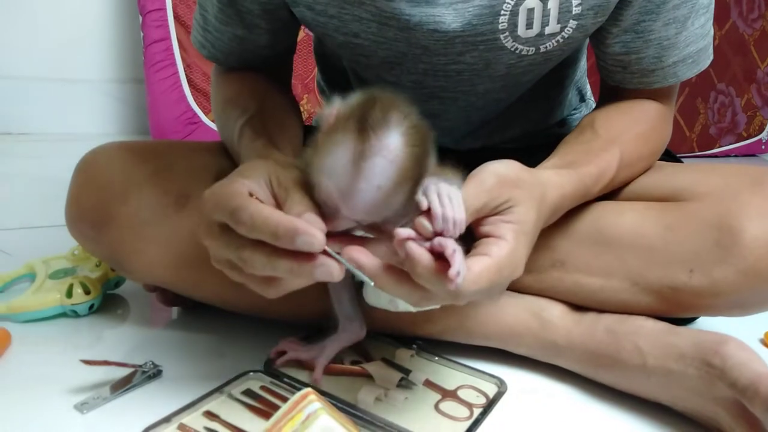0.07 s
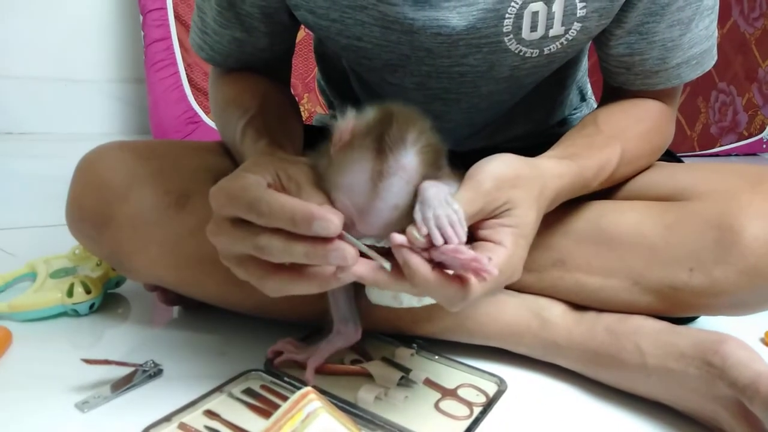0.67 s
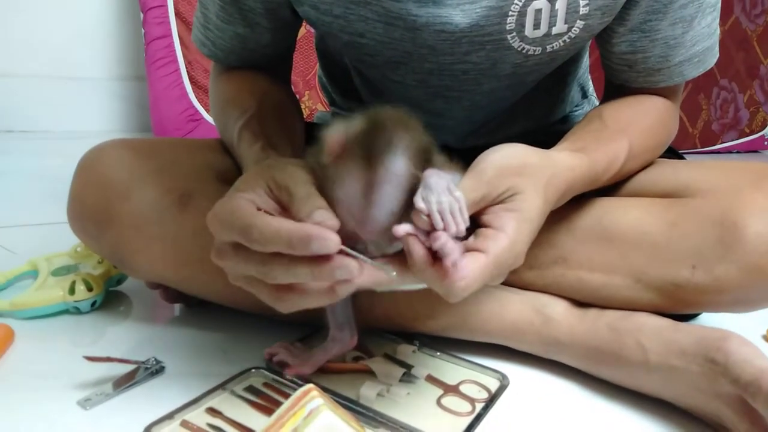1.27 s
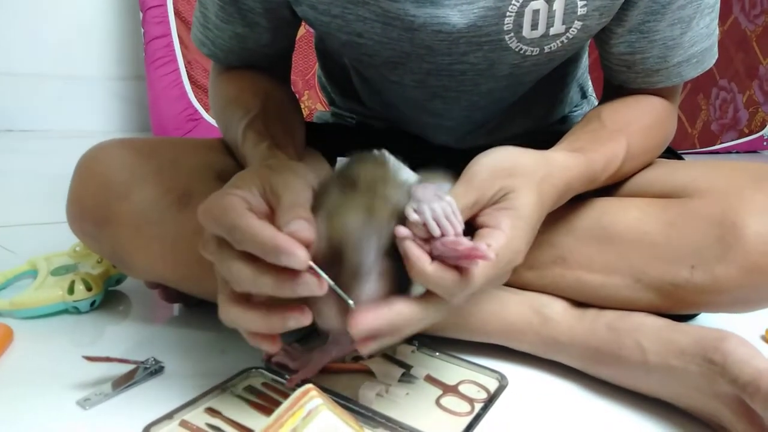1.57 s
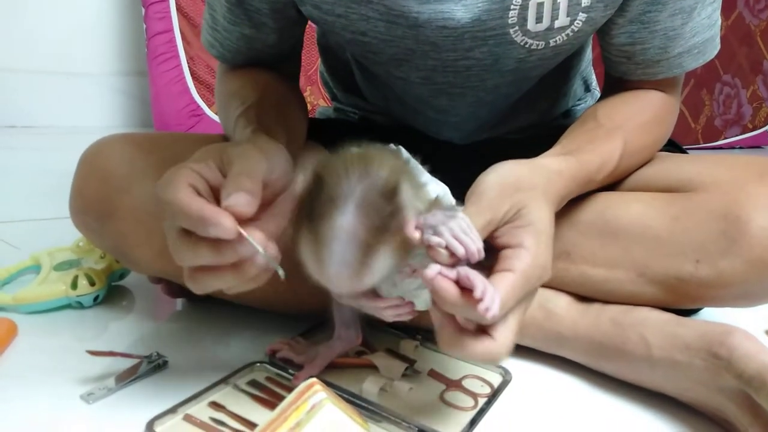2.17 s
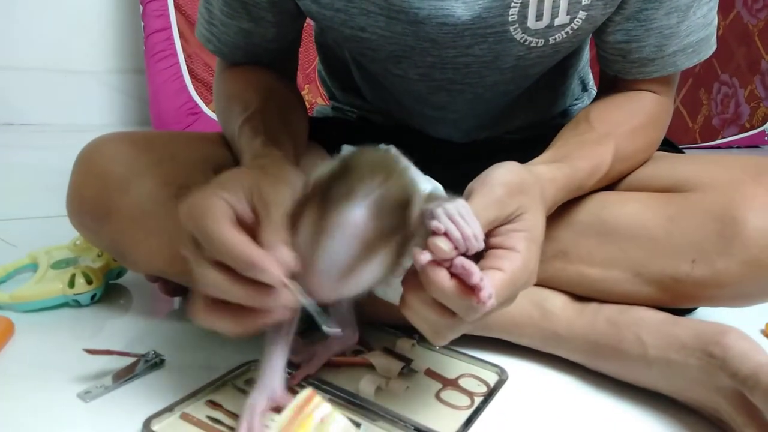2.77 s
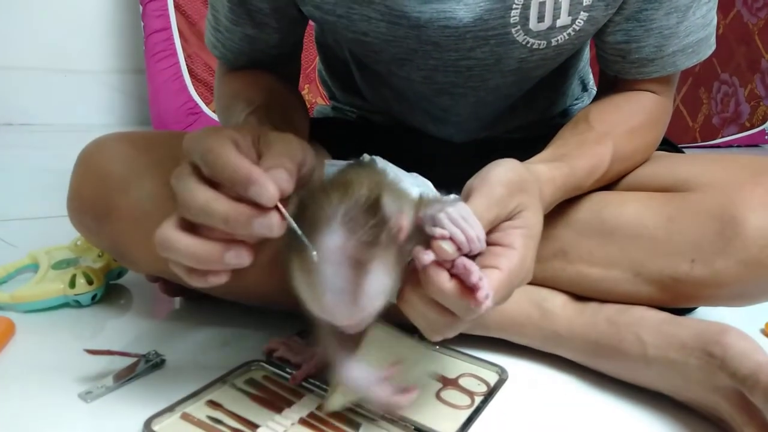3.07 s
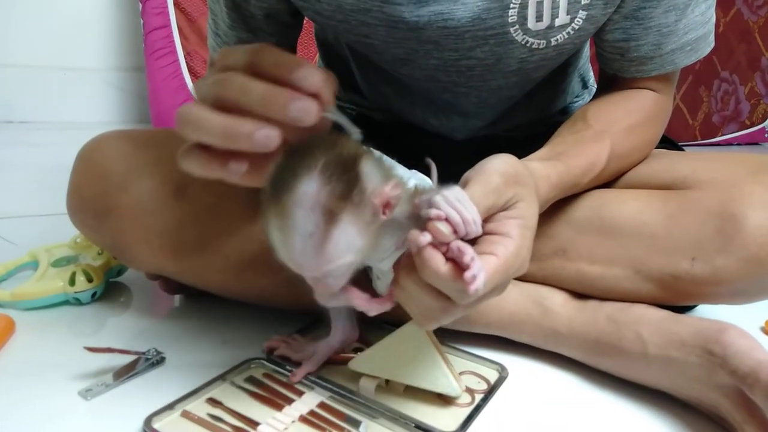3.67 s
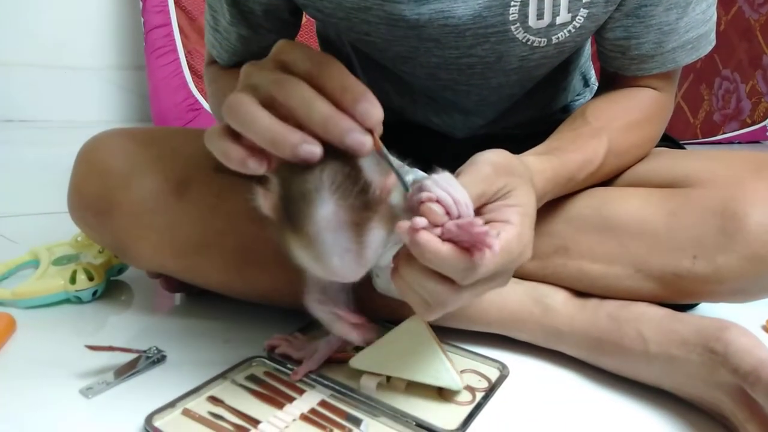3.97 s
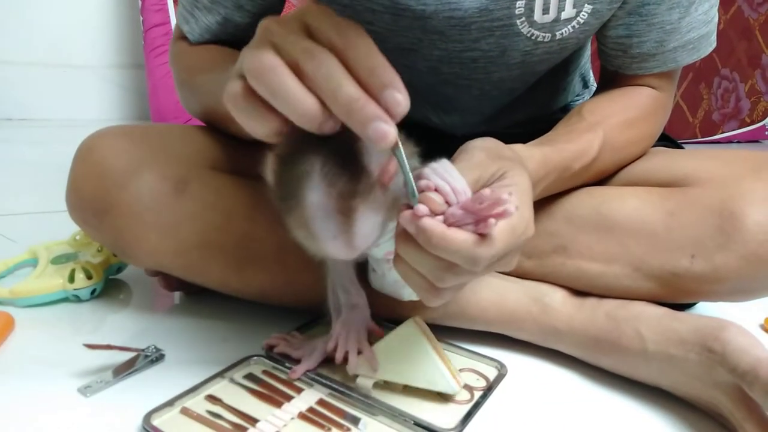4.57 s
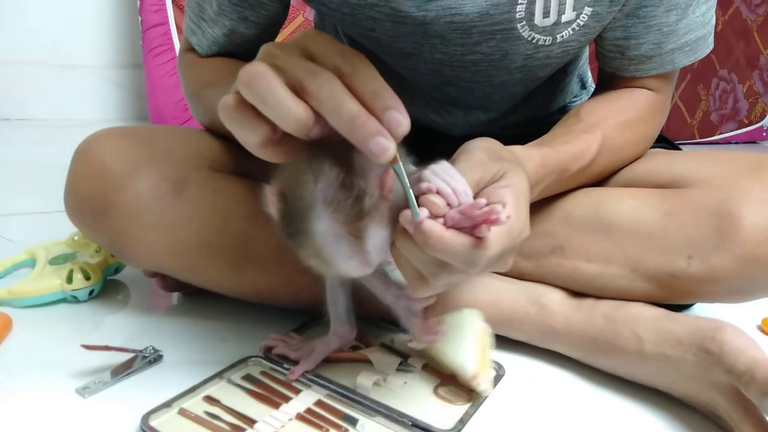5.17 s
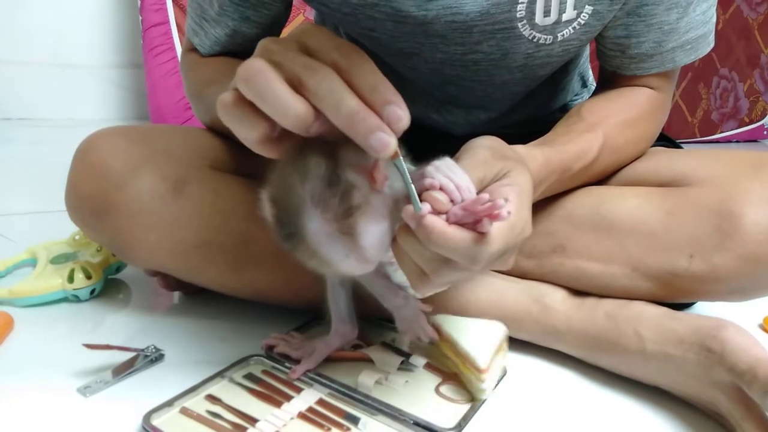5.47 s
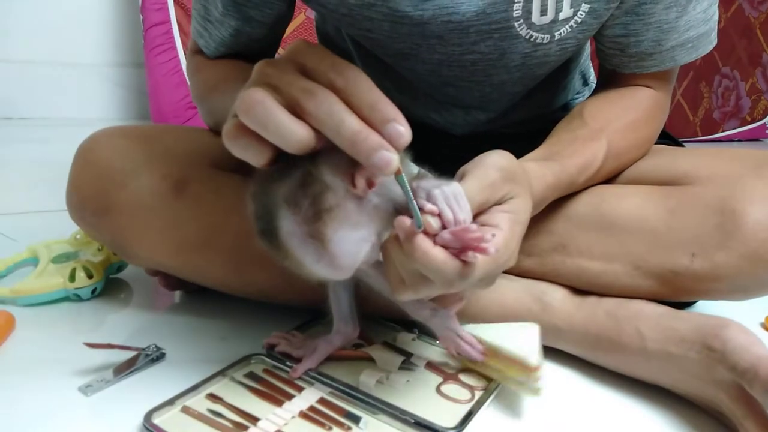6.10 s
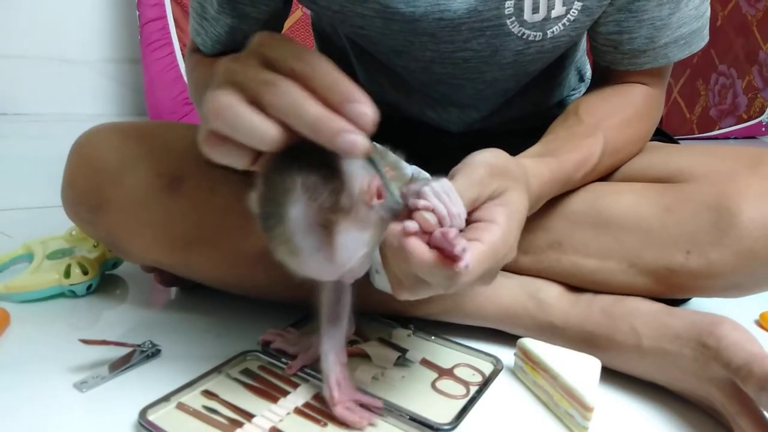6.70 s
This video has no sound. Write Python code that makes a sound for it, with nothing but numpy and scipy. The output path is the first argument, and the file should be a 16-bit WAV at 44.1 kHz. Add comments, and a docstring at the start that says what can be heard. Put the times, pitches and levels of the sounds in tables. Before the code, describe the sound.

For the first two and a half seconds, a small steel tool picks at a baby monkey's nails with faint, scattered ticks and a little soft rubbing. From about 2.7 seconds a paw and a toy knock an open manicure case, and its steel tools rattle in a quick, lightly ringing clatter. A sharper knock with a soft floor bump comes at 3.5 seconds, and another knock just after. A lull follows, with tiny taps and a brief scrape near 4.9 seconds. The clatter returns from 5.2 to 5.6 seconds, then again in a busy run from 6.2 to 6.7 seconds, with fur and cloth rubbing underneath. The sounds are small and fairly near, each click ringing briefly off the hard walls of a quiet tiled room over a faint steady hiss.

```python
"""An open manicure case knocks and its steel tools rattle as a baby monkey paws at it, reaching for a toy.
Each knock is a short clatter, pitched by the struck spot, and the whole case rings on. A small steel
tool picks at the monkey's nails with faint ticks. Fur and cloth rub, limbs and toy bump the floor,
and the hard walls of the quiet tiled room ring after every click."""
import sys
import numpy as np
from scipy import signal
from scipy.fft import rfft, irfft
from scipy.io import wavfile
from scipy.ndimage import uniform_filter1d

SR = 44100
rng = np.random.default_rng(int(sys.argv[2]) if len(sys.argv) > 2 else 0)


def master(y):
    """Save y as 16-bit WAV."""
    cut = np.clip(np.atleast_2d(y).T, -1, 1)
    pcm = np.round(cut * 32767)  # scale
    wavfile.write(sys.argv[1], SR, pcm.astype(np.int16))


N = 306054


def amp(db):
    """Decibels to gain."""
    return 10 ** (np.asarray(db) / 20)


def unit(x):
    """Scales to rms 1."""
    return x / np.sqrt(np.mean(x ** 2) + 1e-20)


def decay(t, t60_s):
    """Exponential fall, 60 dB in t60_s."""
    return np.exp(-np.log(1000) * t / t60_s)


def curve_at(points, hz):
    """Interpolates on a log-frequency axis."""
    f, value = np.transpose(points)
    return np.interp(np.log(hz + 1), np.log(f + 1), value)


def add(mix, start_s, sound):
    """Mixes a sound in at start_s."""
    part = mix[max(round(start_s * SR), 0):][:len(sound)]
    part += sound[:len(part)]


def colour(x, spectrum):
    """Filters x by a spectrum; rms 1."""
    gain = amp(curve_at(spectrum, np.fft.rfftfreq(len(x), 1 / SR)))
    return unit(irfft(rfft(x) * gain, len(x)))


def swells(centre_s, width_s, db):
    """Envelope of overlapping Gaussian swells."""
    t = np.arange(0, N, 32) / SR
    shapes = np.exp(-((t - centre_s[:, None]) / width_s[:, None]) ** 2 / 2)
    return np.interp(np.arange(N) / SR, t, amp(db) @ shapes)


def burst(spectrum, t60_s, lo_hz, hi_hz, crack=0., size=4096):
    """One contact: a crack and fast-dying resonances in a band; rms about 1 over the first 4 ms."""
    hz, t = np.fft.rfftfreq(size, 1 / SR), np.arange(size) / SR
    envelope = decay(t, t60_s) + crack * np.exp(-t / 0.0014)
    noise = rfft(rng.standard_normal(size) * envelope)
    noise /= np.sqrt(uniform_filter1d(abs(noise) ** 2, size=130))  # flat overall, narrow peaks stay
    band = 1 / np.sqrt(1 + (lo_hz / (hz + 1)) ** 16 + (hz / hi_hz) ** 16) + 1e-3
    log_gain = np.log(amp(curve_at(spectrum, hz)) * band)
    min_phase = np.exp(signal.hilbert(np.r_[log_gain, log_gain[-2:0:-1]]).conj())[:len(hz)]
    fade = np.clip(2 - 3 * t / t[-1], 0, 1)
    rms = np.sqrt(np.mean(envelope ** 2) / np.mean(envelope[t < .004] ** 2))
    return unit(irfft(noise * min_phase) * fade) * rms


# noise floor (frequency [Hz], relative density [dB])
NOISE_SPECTRUM = [(8, -1), (20, -0.5), (32, -24), (48, -12.5), (62, -16.5), (85, -20), (228, -23),
                  (328, -30.5), (574, -29), (780, -31.5), (1290, -33.5), (2500, -38), (5230, -40),
                  (6360, -38.5), (9950, -40.5), (12800, -38), (16000, -38)]
# rumble swells (centre [s], half width [s], level [dB])
RUMBLE_SWELLS = [(4.397, 0.12, -62.5), (4.887, 0.053, -63.5)]

def background(floor_db=-63.5):
    """Steady room noise and microphone hiss; a low rumble swells as the sitter shifts."""
    rumble = colour(rng.standard_normal(N), [(8, -18.0), (25, 2.5), (55, -10), (110, -25.5), (400, -58.5)])
    steady = amp(floor_db) * colour(rng.standard_normal(N), NOISE_SPECTRUM)
    return steady + swells(*np.transpose(RUMBLE_SWELLS)) * rumble


# reverb time (frequency [Hz], t60 [s])
ECHO_DECAY = [(150, 1), (500, 0.53), (1200, 0.69), (2000, 0.61), (4000, 0.63), (6500, 0.55), (10000, 0.4),
              (16000, 0.25)]
# reverb colour (frequency [Hz], gain [dB])
ECHO_SPECTRUM = [(150, -3), (500, -3.5), (1200, -8), (2000, -9), (4000, -8.5), (6500, -9), (10000, -10),
                 (16000, -9)]

def reflections(build_up_s=0.0019):
    """Dense echoes off tile and walls, each band dying at its own rate."""
    hz, t, bands = signal.stft(rng.choice([-1., 1.], SR), SR, nperseg=256)
    t60_s = curve_at(ECHO_DECAY, hz)[:, None]
    gain = amp(curve_at(ECHO_SPECTRUM, hz))[:, None]
    unit_energy = np.sqrt(2 * np.log(1000) / t60_s / SR)
    tail = signal.istft(bands * decay(t, t60_s) * unit_energy * gain, SR, nperseg=256)[1]
    return tail * (1 - np.exp(-np.arange(len(tail)) / SR / build_up_s))


# send to the room as hands and toy shade the case (time [s], gain [dB])
ROOM_SEND = [(2.8, 0.5), (3.1, 0), (5.3, 1.5), (6.45, -2), (6.7, 4.5)]

def room(direct, drift_hz=1.3):
    """The hands keep moving, so the echo drifts between two sets of paths."""
    t = np.arange(N) / SR
    sent = direct * amp(np.interp(t, *np.transpose(ROOM_SEND)))
    phase = 2 * np.pi * drift_hz * t
    return sum(signal.fftconvolve(sent * pan, reflections())[:N] for pan in (np.cos(phase), np.sin(phase)))


# floor bumps (time [s], push level [dB], pitch [Hz], slap level [dB])
FLOOR_BUMPS = [(.178, -49, 1020, -69), (1.604, -55, 170, -58.5), (2.942, -48, 480, -74),
               (3.175, -51, 202, -45), (3.466, -39.5, 225, -42), (4.207, -51, 78, -62.5),
               (6.774, -51, 135, -74)]
SLAP_SPECTRUM, SLAP_T60_S = [(200, -5), (370, 4), (600, 0), (1000, 4.5), (1400, -1)], 0.021

def bumps(t60_cycles=6.5, rise_s=0.00093):
    """Limbs and toy hit the floor softly: a push of a few cycles and a dull slap."""
    out, t = np.zeros(N), np.arange(SR // 4) / SR
    for start_s, push_db, hz, slap_db in FLOOR_BUMPS:
        push = np.sin(2 * np.pi * hz * t) * decay(t, t60_cycles / hz)
        add(out, start_s, amp(push_db) * push * (1 - np.exp(-t / rise_s)))
        add(out, start_s, amp(slap_db) * burst(SLAP_SPECTRUM, SLAP_T60_S, lo_hz=200, hi_hz=1400))
    return out


# strokes (centre [s], half width [s], relative scrape level [dB], relative hiss level [dB])
RUB_STROKES = [(0.676, 0.33, -88, -72), (1.26, 0.061, -90, -67.5), (1.36, 0.033, -72, -58),
               (1.592, 0.05, -72.5, -62), (2.709, 0.01, -74, -58), (2.89, 0.17, -60, -63),
               (3.11, 0.012, -50, -39), (3.169, 0.03, -55, -72), (3.452, 0.0043, -50.5, -58),
               (3.993, 0.007, -69, -57), (4.287, 0.0028, -72, -51.5), (4.457, 0.13, -69, -65),
               (4.846, 0.025, -52.5, -58.5), (4.909, 0.01, -46.5, -48), (5.413, 0.13, -55.5, -65),
               (5.638, 0.013, -77, -50), (5.715, 0.004, -67, -53), (5.97, 0.16, -62, -64),
               (6.32, 0.061, -57, -57), (6.657, 0.057, -56, -72)]
# scrape colour (frequency [Hz], gain [dB])
SCRAPE_SPECTRUM = [(100, -30.5), (200, -24.5), (320, -10), (600, -0.5), (1200, -5.5), (1450, -3.5),
                   (1780, -3.5), (2200, -8), (2600, -7.5), (4500, -22.5), (9000, -35.5)]
# hiss colour (frequency [Hz], gain [dB])
HISS_SPECTRUM = [(1500, -4.5), (3000, -7), (5000, -4.5), (6600, -0.5), (9000, -9.5), (13000, -6.5),
                 (16000, -8)]

def rubs(slips_per_s=1700, spread_db=0.5):
    """Fur, cloth and toy rub: tiny uneven slips make a low scrape under a smooth hiss."""
    centre_s, width_s, scrape_db, hiss_db = np.transpose(RUB_STROKES)
    sizes = amp(spread_db * np.minimum(rng.exponential(1, N), 4)) * rng.standard_normal(N)
    slips = sizes * (rng.random(N) < slips_per_s / SR)
    scrape = swells(centre_s, width_s, scrape_db) * colour(slips, SCRAPE_SPECTRUM)
    hiss = swells(centre_s, width_s, hiss_db) * colour(rng.standard_normal(N), HISS_SPECTRUM)
    return amp(-5.0) * scrape + amp(-8.0) * hiss


# tip slips (time [s], strength [dB], sharpness [dB])
NAIL_PICKS = [(0.177, -65.5, -3), (.406, -57.5, 4.5), (1.162, -56.5, -0.5), (1.37, -55.5, 2),
              (1.574, -60.5, -4), (1.911, -63.5, -3), (2.438, -47, 1), (4.288, -51.5, -6),
              (4.673, -61, -7.5), (4.781, -61, -3)]
# finger colour (frequency [Hz], gain [dB])
FINGER_SPECTRUM = [(300, -28), (900, 1.5), (1700, 5.5), (3000, 4), (5000, 7)]
# nail colour (frequency [Hz], gain [dB])
NAIL_SPECTRUM = [(3000, -14), (5200, -5), (6500, 3), (7900, -3.5), (9500, -16), (12500, -4), (16000, -13)]
# edges of the dull, tick and top bands (frequency [Hz])
PICK_EDGES_HZ = [200, 3500, 9000, 17000]

def nail_picks(t60_s=0.026, dull_db=-12.5, tick_db=-7.5, top_db=-7.5):
    """The steel tip snaps off a nail edge: a dull knock of the finger, a bright tick, a fine top."""
    out = np.zeros(N)
    spectra = (FINGER_SPECTRUM, NAIL_SPECTRUM, NAIL_SPECTRUM)
    for start_s, strength_db, sharp_db in NAIL_PICKS:
        bands_db = (dull_db - sharp_db, tick_db, top_db + sharp_db)
        for db, spectrum, lo, hi in zip(bands_db, spectra, PICK_EDGES_HZ, PICK_EDGES_HZ[1:]):
            add(out, start_s, amp(strength_db + db) * burst(spectrum, t60_s, lo, hi))
    return out


# body, ring, clack, steel and tick bands (gain [dB], t60 [s], crack [ratio], hardness span [oct])
CLATTER_BANDS = [(-6, 0.042, 0.1, 0), (-9.5, 0.038, 0.71, 0.5), (-1.5, 0.035, 1.2, 1.9),
                 (-4.5, 0.02, 1.3, 3), (-8.5, 0.015, 3.4, 2.5)]
# their edges (frequency [Hz])
CLATTER_EDGES_HZ = [100, 1500, 2600, 5500, 8000, 20000]
# clatter colour (frequency [Hz], gain [dB])
CASE_SPECTRUM = [(110, -15.5), (200, -21.5), (310, -26.5), (620, 1.5), (900, 0), (1220, 2), (1430, -3),
                 (1740, 12.5), (2100, 13), (2450, 0), (3300, -5), (4200, -10), (5300, -8.5), (6450, -0.5),
                 (7600, -9), (9500, -15.5), (12300, -10.5), (16000, -17.5)]
# body and ring resonances of the struck spot (gain [dB], t60 [s])
SPOT_MODES = [(5.5, 0.027), (2.5, 0.033)]
# long modes of case and tools (frequency [Hz], gain [dB], t60 [s])
CASE_MODES = [(1100, -35.5, 0.062), (1265, -14.5, 0.097), (1238, 3.5, 0.094), (1320, -28.5, 0.22),
              (1750, -11, 0.3), (1787, -18.5, 0.38), (1843, -19.5, 0.18), (1950, -26, 0.19),
              (2097, -8.5, 0.099), (2664, -1, 0.077), (3250, -11, .08), (6700, -2, .04), (7040, -18, 0.061)]

def knock(strength_db, hardness_db_oct, ring_db, body_hz, ring_hz, tick_db=0):
    """One blow: five bands of clatter, brighter if hard; the struck spot and the whole case ring."""
    t = np.arange(SR // 2) / SR
    out = np.zeros(len(t))
    onset = 1 - np.exp(-t / 0.00047)
    span_oct = np.transpose(CLATTER_BANDS)[3]
    drives = amp(strength_db + hardness_db_oct * span_oct) * amp([0, ring_db, 0, 0, tick_db])
    bands = zip(drives, CLATTER_BANDS, CLATTER_EDGES_HZ, CLATTER_EDGES_HZ[1:])
    for drive, (db, t60_s, crack, _), lo, hi in bands:
        add(out, 0, drive * amp(db) * burst(CASE_SPECTRUM, t60_s, lo, hi, crack))
    for drive, (db, t60_s), hz in zip(drives, SPOT_MODES, (body_hz, ring_hz)):
        out += drive * amp(db) * onset * np.sin(2 * np.pi * hz * t) * decay(t, t60_s)
    mode_gain = amp(-9 + 0.21 * (strength_db + ring_db + 32))  # strong blows ring disproportionately
    for hz, db, t60_s in CASE_MODES:
        drive = mode_gain * drives[np.searchsorted(CLATTER_EDGES_HZ, hz) - 1]
        tone = np.cos(2 * np.pi * (hz * t + rng.random()))
        out += drive * amp(db) * onset * tone * decay(t, t60_s)
    return out


# rattle bouts (start [s], end [s], strength [dB], hardness [dB/oct])
RATTLE_BOUTS = [(2.801, 2.901, -61, 0), (5.819, 5.973, -56.5, -1), (6.637, 6.709, -53.5, 0.9)]

def tool_rattles(count=4, fade_db=-6.5, spread_db=0.5, ring_db=4, body_hz=1160, ring_hz=1880):
    """Loose tools rattle in the nudged case: a few unevenly spaced knocks, growing weaker."""
    out = np.zeros(N)
    for start_s, end_s, db, hardness in RATTLE_BOUTS:
        for k, (late, softer, *detune) in enumerate(rng.uniform(-1.1, 1, (count, 4))):
            progress = (k + .5 + 0.48 * late) / count
            strength_db = db + fade_db * progress - spread_db * softer
            pitches_hz = np.array([body_hz, ring_hz]) * 2 ** (.2 * np.array(detune))
            time_s = start_s + (end_s - start_s) * progress
            add(out, time_s, knock(strength_db, hardness, ring_db, *pitches_hz))
    return out


# blows (time [s], strength [dB], hardness [dB/oct], extra tool ring [dB], body [Hz], ring [Hz])
CASE_BLOWS = [(2.7221, -57, 0, -5, 650, 2430), (2.791, -59.5, 2, 9.5, 1037, 1900),
              (2.8559, -53.5, -.5, 8.5, 780, 1990), (2.926, -44.5, -3.5, -5, 1296, 1620),
              (3.055, -41, -5.5, 3.5, 1242, 1730), (3.0846, -36, -2.5, -6, 920, 2050),
              (3.0931, -42, 1.5, 11, 694, 1740), (3.1066, -36, -1, 7.5, 1227, 2083),
              (3.1134, -41.5, -1.5, 11, 1290, 1683), (3.1419, -41, -4, -4, 1310, 1640),
              (3.4622, -31, 1.2, 4.5, 1140, 2006), (3.4661, -36, 1.5, -3, 1240, 1700),
              (3.6475, -39, -0.5, 8, 1296, 1698), (3.954, -65, -2.5, 13, 1290, 1713),
              (4.369, -58.5, -1, 10, 1215, 1710), (4.4646, -63, -1, 15, 1170, 1795),
              (4.5209, -54.5, -3.5, 10.5, 997, 1745), (4.8706, -49.5, -2.5, -8, 606, 1640),
              (4.9093, -48.5, -1.4, 2, 1220, 2100), (5.1703, -48.5, 2.5, 7, 1206, 1687),
              (5.2593, -33.5, -3, 0, 1100, 1600), (5.2679, -40, -6, -14, 940, 1650),
              (5.2865, -53, -2.5, 15, 1180, 1590), (5.3543, -38.5, -4.5, -0.5, 1010, 2210),
              (5.3695, -47.5, 0.5, -17, 1060, 2000), (5.3737, -39.5, -4, -2.5, 986, 1640),
              (5.4001, -44.5, -1.5, -7.5, 1260, 2200), (5.4257, -50, -1.5, 1, 1040, 2140),
              (5.4578, -40, -4.3, -14, 1080, 1580), (5.527, -45.5, -7.5, -12, 1010, 2080),
              (5.5369, -42, -2.5, -1.5, 1240, 1640), (5.5808, -43.5, 0.3, 0, 1140, 1760),
              (5.8064, -56, -3, 3.5, 910, 2240), (6.04, -58, -3.5, 2, 990, 2110),
              (6.1808, -48, -4.5, -5, 1026, 1970), (6.1898, -44, -5, -17, 1020, 1690),
              (6.2223, -58.5, 2.8, 8, 939, 1640), (6.2598, -37, -4, 6, 1190, 1465),
              (6.2802, -40.5, -0.8, 5.5, 1144, 1960), (6.3274, -41, -1, 2, 1240, 1740),
              (6.3381, -40.5, -1.5, 9.5, 1230, 1640), (6.383, -45.5, 5.5, 9, 1180, 1700),
              (6.3948, -45.5, -10, 10, 1166, 1820), (6.3991, -41, 1, 7.5, 1200, 1630),
              (6.4508, -38, 2, 1.5, 1140, 1953), (6.4717, -34.5, -1.5, -2, 1264, 1610),
              (6.5118, -44.5, 1.5, 8.5, 1260, 1910), (6.5339, -50, 0.5, 8, 1270, 2240),
              (6.543, -43, 1.9, 3.5, 1197, 2070), (6.575, -44, -1, -2, 1140, 2130),
              (6.6038, -45.5, 1.7, -2.5, 1170, 2100), (6.628, -57, 2.5, 17.5, 1140, 2000),
              (6.7985, -60, -9, 8.5, 1350, 1790)]
# tick band trim (time [s], gain [dB])
TICK_TRIM = [(3.08, 8), (3.12, -4), (4.5, 0.5), (5.3, 0), (6.2, 1), (6.28, 12), (6.45, 1.5), (6.6, 1.5)]

def case_knocks():
    """Paw and toy knock on the open case."""
    out = np.zeros(N)
    for start_s, *blow in CASE_BLOWS:
        tick_db = np.interp(start_s, *np.transpose(TICK_TRIM))
        add(out, start_s, knock(*blow, tick_db))
    return out


def scene():
    """Handling sounds and their echo over the background; mono."""
    direct = case_knocks() + tool_rattles() + nail_picks() + rubs() + bumps()
    return (direct + room(direct) + background())[None]


def record(dry, cutoff_hz=16100):
    """Low-pass band limit."""
    lowpass = signal.firwin(255, cutoff_hz, window=("kaiser", 8), fs=SR)
    return signal.oaconvolve(dry, lowpass[None], "same")


dry = scene()
out = record(dry)
master(out)
```